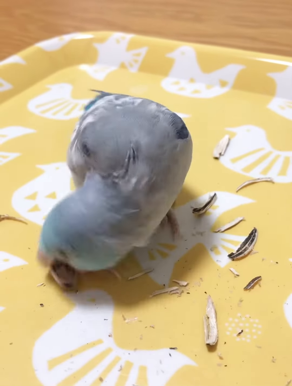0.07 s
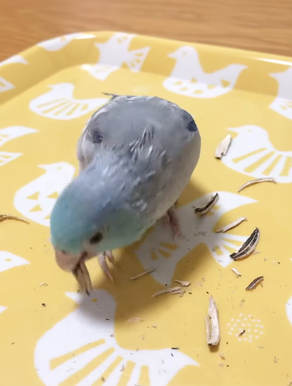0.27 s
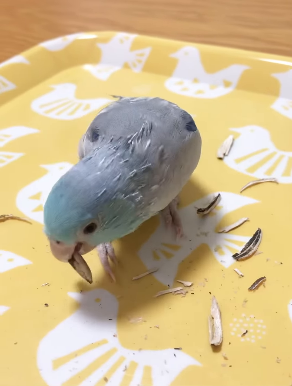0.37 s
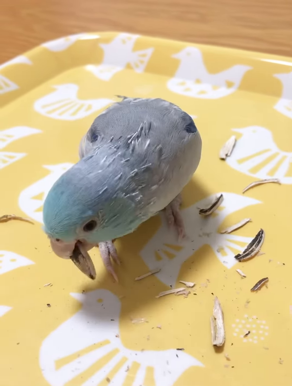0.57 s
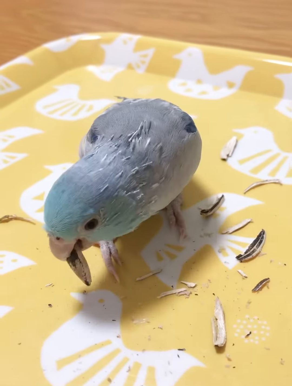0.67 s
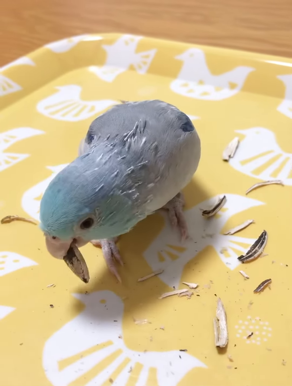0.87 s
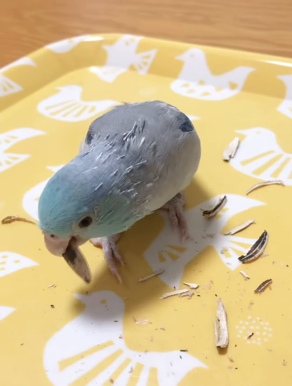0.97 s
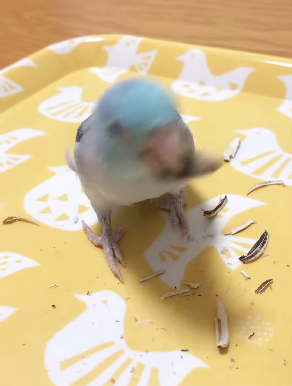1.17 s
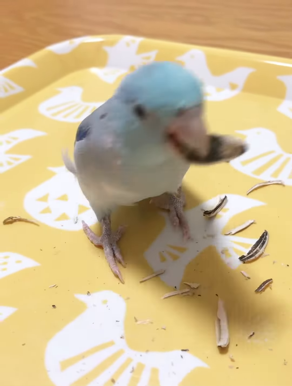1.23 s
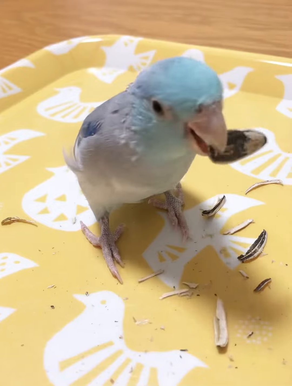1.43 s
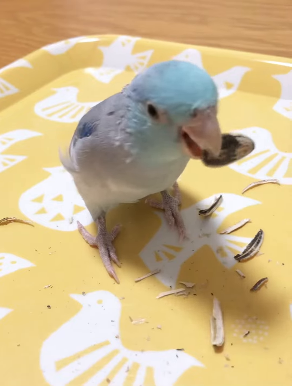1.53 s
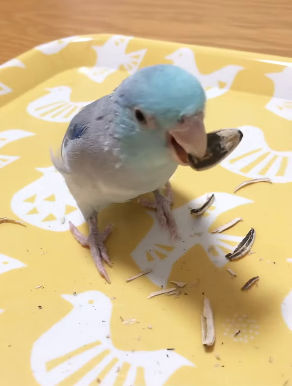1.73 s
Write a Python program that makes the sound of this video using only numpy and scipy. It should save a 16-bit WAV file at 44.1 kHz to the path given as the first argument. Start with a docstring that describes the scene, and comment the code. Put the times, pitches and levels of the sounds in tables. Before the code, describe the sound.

Sparse, dry clicks of a seed husk breaking in a small bird's beak follow a quick run of taps on a plastic tray. Faint feather rustles and two soft steps come between them, heard close in a faintly humming room.

```python
"""A small parrot picks a sunflower seed off a plastic tray, close by in a quiet, faintly humming room.
First seed and beak knock on the tray and ring its modes, the last time with a sharp snap. Then the
husk ticks and crackles as it fractures in the beak, a foot thumps softly, and the seed slips with
faint squeaks of friction. Feathers rustle as the bird straightens up, the husk gives its sharpest
crack, and a second soft footfall comes among the last ticks."""
import sys
import numpy as np
from scipy import signal
from scipy.fft import rfft, irfft
from scipy.io import wavfile
from scipy.ndimage import uniform_filter1d

SR = 44100
rng = np.random.default_rng(int(sys.argv[2]) if len(sys.argv) > 2 else 0)


def to_wav(sig):
    """Store sig (one row per channel, or 1-D mono) as 16-bit WAV at the path in sys.argv[1].

    Samples outside -1..1 are clipped; the rate is SR.
    """
    pcm = np.clip(np.atleast_2d(sig), -1, 1) * 32767
    pcm = np.round(pcm).astype(np.int16)
    wavfile.write(sys.argv[1], SR, pcm.T)  # frames by channels


N = 79380
T = np.arange(N) / SR


def undb(db):
    """Amplitude grows tenfold for every 20 decibels."""
    return 10 ** (np.asarray(db) / 20)


def add(out, start_s, x):
    """Superposition: x sums into out from start_s on."""
    i = max(int(round(start_s * SR)), 0)
    out[i:i + len(x)] += x[:max(N - i, 0)]


def lowpass(x, hz, order=2):
    """A Butterworth filter attenuates what lies above hz."""
    return signal.sosfilt(signal.butter(order, min(hz, .45 * SR), fs=SR, output="sos"), x)


def highpass(x, hz, order=2):
    """A Butterworth filter attenuates what lies below hz."""
    return signal.sosfilt(signal.butter(order, hz, "high", fs=SR, output="sos"), x)


def noise(spectrum):
    """Spectral shaping: noise of unit RMS follows (frequency_hz, density_db) points."""
    hz, db = np.array(spectrum).T
    bins_hz = np.maximum(np.fft.rfftfreq(N, 1 / SR), 1)
    gain = undb(np.interp(np.log(bins_hz), np.log(hz), db))
    x = irfft(rfft(rng.standard_normal(N)) * gain, N)
    return x / x.std()


def ring(modes, pitch_ratio=1, size=3000):
    """Modal vibration: damped modes swell quickly and fade, neighbours in opposite phase."""
    t, out = T[:size], 0
    for k, (hz, db, t60_s) in enumerate(modes):
        damping = np.log(1000) / t60_s
        envelope = 2 * damping ** 2 / SR * t * np.exp(-damping * t)
        out += (-1) ** k * undb(db) * envelope * np.sin(2 * np.pi * hz * pitch_ratio * t)
    return out


def tray_knocks(size=3000):
    """Impacts ring the tray and send a broad clack to the walls; softer contact excites less treble."""
    # knocks of seed and beak: start_s, level_db, cutoff_hz, pitch_ratio
    knocks = [(.0008, -23, 2760, 0.91), (0.0214, -17.5, 5660, 0.95), (.0345, -20, 1765, 1),
              (0.1266, -27.5, 3122, 0.9), (.1440, -31, 2243, 1), (0.1495, -26.5, 2572, 0.93),
              (0.1676, -21.5, 1650, 0.92), (0.189, -25, 1605, 1), (.2271, .5, 18910, 0.99)]
    # modes of the tray with the seed on it: pitch_hz, resonance_db, t60_s
    tray_modes = [(1209, 9.5, 0.0074), (1735, 11.5, .012), (2046, 5, 0.014), (2277, 10, .0093),
                  (2789, 3.5, 0.0091), (3225, 7, 0.0046), (3990, 8.5, 0.00828), (4532, 4, 0.0067),
                  (5250, 3, 0.0039), (6625, 3.5, 0.0036), (7128, 2, 0.0063), (9230, 5, 0.00091),
                  (12760, 7, .0022), (15008, -0.5, .0014)]
    rings, clacks = np.zeros(N), np.zeros(N)
    blow = signal.unit_impulse(size)
    snap = undb(-7) * highpass(blow, hz=7950)  # the bare click of contact
    clack = undb(1) * highpass(blow, hz=715)
    for start_s, level_db, cutoff_hz, pitch_ratio in knocks:
        body = highpass(ring(tray_modes, pitch_ratio), hz=775, order=3)  # small things radiate little bass
        add(rings, start_s, undb(level_db) * lowpass(body + snap, cutoff_hz, order=3))
        add(clacks, start_s, undb(level_db) * lowpass(clack, cutoff_hz, order=3))
    return rings, clacks


def husk_cracks(size=500, trail_fade_s=0.0038):
    """Resonance: each crack is a click with a short noisy trail, coloured by the modes of the husk."""
    # cracks in the beak: start_s, body_db, middle_db, edge_db, top_db, pitch_ratio, trail_db
    cracks = [(0.0608, -35.5, -43, -33.5, -40, 1.22, -1), (.1890, -60, -40, -38.5, -45, 1.05, -10),
              (0.3488, -50, -46, -34, -30, 0.86, -6), (.5030, -30, -37, -55, -44, 1.12, -9),
              (0.5318, -59, -43, -42, -47, 1.1, 6), (0.5843, -37, -62, -38.5, -40, 0.83, 6.5),
              (0.5889, -32, -38, -45, -42, 0.91, -1.5), (0.5946, -37, -21, -28.5, -34, 0.88, -43),
              (0.5938, -26, -27, -45, -24.5, 1.08, -26), (.6650, -47, -54, -47.5, -43, 1.02, 6),
              (0.9706, -52, -56, -40.5, -40.5, 0.9, 3), (1.002, -43, -44, -41.5, -50, 1.01, 1),
              (1.062, -62, -43, -46.5, -52, 1.3, 8), (1.0780, -56, -34.5, -44, -49, 1.15, 5),
              (1.181, -52.5, -47, -38, -48, 1.16, 5.5), (1.2958, -60, -30, -13, -23, 1.054, -23),
              (1.4542, -39, -33.5, -45, -41, 0.85, 2), (1.551, -43, -43.5, -55, -48, 0.58, -6),
              (1.684, -53, -50, -40, -48, 0.92, -4), (1.7460, -39.5, -22.5, -29, -39, 1.02, -6.5)]
    # modes of husk and beak, grouped as body, middle, edge, top: pitch_hz, resonance_db, t60_s
    mode_groups = [
        [(980, -10, 0.0025), (1857, 5, 0.0063), (2610, -0.5, 0.0032)],
        [(3160, -9, 0.009), (4513, -0.5, 0.0022)],
        [(5700, -11.5, 0.0015), (7940, 0, 0.0005), (11100, -6, 0.0014)],
        [(11520, -2, 0.0012), (14600, 4.5, 0.00048)],
    ]
    out = np.zeros(N)
    for start_s, *group_levels_db, pitch_ratio, trail_db in cracks:  # colour and pitch vary with the grip
        trail = rng.standard_normal(size) ** 3 * np.exp(-T[:size] / trail_fade_s)
        click = signal.unit_impulse(size) + undb(trail_db) * trail / np.linalg.norm(trail)
        shell = 0
        for level_db, modes in zip(group_levels_db, mode_groups):
            cutoff_hz = 0.39 * modes[0][0]  # little radiates below the group's lowest mode
            shell += undb(level_db) * highpass(ring(modes, pitch_ratio), cutoff_hz)
        add(out, start_s, np.convolve(click, shell))
    return out


def seed_squeaks():
    """Friction: the seed slips in the beak with faint, rough tones, some of them rising."""
    # slips: peak_s, spread_s, level_db, pitch_hz, rise_hz_per_s, width_hz
    slips = [(0.649, 0.065, -75.5, 5900, 0, 301.4), (1.159, 0.025, -75, 2450, 2006, 60),
             (1.205, .03, -71.5, 2880, 3997.5, 127), (1.212, 0.027, -78, 4000, 6002, 130),
             (1.225, .03, -82, 5100, 7001, 150), (1.53, 0.024, -74, 3100, 1, 400)]
    out = np.zeros(N)
    for peak_s, spread_s, level_db, pitch_hz, rise_hz_per_s, width_hz in slips:
        t = T - peak_s
        swell = undb(level_db) * np.exp(-(t / spread_s) ** 2)
        grip = lowpass(rng.standard_normal(N), width_hz)
        tone = np.sin(2 * np.pi * np.cumsum(pitch_hz + rise_hz_per_s * t) / SR)
        out += swell * grip / grip.std() * tone
    return out


def footsteps():
    """Impulse response: each shift of weight thumps the low modes of the whole tray."""
    # soft footfalls: start_s, level_db
    steps = [(0.43, -9), (1.551, -3.5)]
    # modes of the tray under a foot: pitch_hz, resonance_db, t60_s
    low_modes = [(177, -1, 0.038), (236, -2, 0.11), (530, -14.5, 0.015)]
    out, thump = np.zeros(N), ring(low_modes, size=8000)
    for start_s, level_db in steps:
        add(out, start_s, undb(level_db) * thump)
    return out


def feather_rustles(grain_size=60, grain_depth=0.32):
    """Sliding friction: feathers brush with a grainy noise that swells and fades with each movement."""
    # movements: peak_s, attack_s, fade_s, level_db
    rustles = [(0.469, 0.033, 0.12, -69.5), (1.078, 0.022, 0.039, -70.5), (1.194, 0.017, 0.11, -66.5),
               (1.42, 0.093, 0.37, -85.5), (1.559, 0.12, 0.16, -75.5), (1.79, 0.023, .05, -74)]
    # spectrum of the brushing: frequency_hz, density_db
    spectrum = [(300, -6), (1800, -4), (2900, 1), (4500, -3), (8000, -0.5), (11500, -1.5), (16000, -10)]
    swell = sum(undb(level_db) * np.exp(np.minimum((T - peak_s) / attack_s, (peak_s - T) / fade_s))
                for peak_s, attack_s, fade_s, level_db in rustles)
    flicker = np.sqrt(grain_size) * uniform_filter1d(rng.standard_normal(N), grain_size)
    grain = np.exp(grain_depth * flicker)
    return swell * noise(spectrum) * grain / np.sqrt(np.mean(grain ** 2))


def reflection(spread_s=0.001, size=3000):
    """Scattering: a surface smears an impulse into a puff of noise with softened treble."""
    puff = rng.standard_normal(size) * T[:size] * np.exp(-T[:size] / spread_s)
    return lowpass(puff / np.linalg.norm(puff), hz=9960, order=1)


def room(x, bands=14, delay_s=0.0022, build_s=0.008):
    """Reverberation: early reflections join a diffuse tail in which each band decays at its own rate."""
    # diffuse tail: frequency_hz, level_db, t60_s
    tail = [(288, -2.5, 0.33), (815, -14, 0.17), (1300, -8, 0.38), (2180, -15, .43), (3800, -10.5, 0.41),
            (6330, -11.5, .37), (9100, -18, 0.34), (15000, -21, 0.29)]
    # reflections from nearby surfaces: delay_s, level_db
    echoes = [(0.0132, -14.5), (0.0253, -24.5)]
    hz, db, t60_s = np.array(tail).T
    log_hz = np.log(hz)
    log_bins = np.log(np.maximum(np.fft.rfftfreq(N, 1 / SR), 1))
    centres = np.linspace(log_hz[0], log_hz[-1], bands)
    white = rfft(rng.standard_normal(N))
    t = np.maximum(T - delay_s, 0)
    build = 1 - np.exp(-t / build_s)
    response = np.zeros(N)
    for centre, weights in zip(centres, np.eye(bands)):
        envelope = build * np.exp(-np.log(1000) * t / np.interp(centre, log_hz, t60_s))
        band = irfft(white * np.interp(log_bins, centres, weights), N)
        response += undb(np.interp(centre, log_hz, db)) * band * envelope / np.linalg.norm(envelope)
    for echo_s, echo_db in echoes:
        add(response, echo_s, undb(echo_db) * reflection())
    return signal.fftconvolve(x, response)[:N]


def background():
    """Ambient noise: a continuous spectrum, strongest in the bass, lies under three faint pure tones."""
    # spectrum of the room noise: frequency_hz, density_db
    air = [(15, -36.5), (25, -18), (64, -5.5), (92, -6), (145, -4), (229, -4), (285, -6.5), (326, -10.5),
           (503, -14), (677, -19.5), (1040, -23.5), (2690, -30.5), (4900, -29.5), (5850, -26.5),
           (6900, -30), (11500, -30.5), (16000, -37.5)]
    # tones of the hum: pitch_hz, level_db
    tones = [(119, -74.5), (219, -78.5), (265, -79.5)]
    hum = sum(undb(db) * np.sqrt(2) * np.sin(2 * np.pi * (hz * T + rng.random())) for hz, db in tones)
    return undb(-65.5) * noise(air) + hum


def scene():
    """Superposition: the direct sounds add to the reverberation of tray and beak."""
    knocks, clacks = tray_knocks()
    beak = husk_cracks() + seed_squeaks()
    walls = room(undb(-2.5) * knocks + undb(-5.5) * beak) + room(clacks)
    return (knocks + beak + walls + feather_rustles() + footsteps() + background())[None]


def record(dry):
    """Band limiting: a linear-phase filter cuts the top of the treble."""
    top_hz = 16100
    taps = signal.firwin(101, top_hz, window=("kaiser", 8), fs=SR)
    return signal.fftconvolve(dry, taps[None], mode="same")


dry = scene()
out = record(dry)
to_wav(out)
```